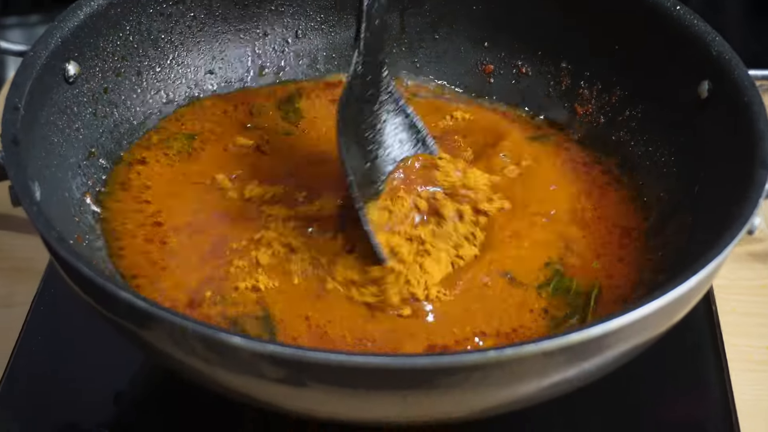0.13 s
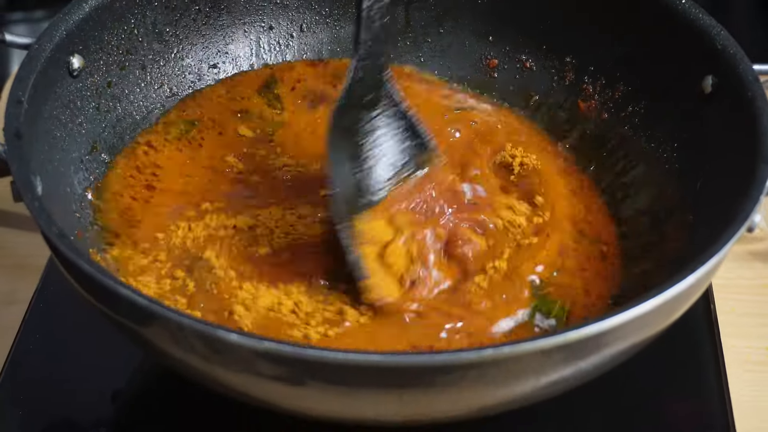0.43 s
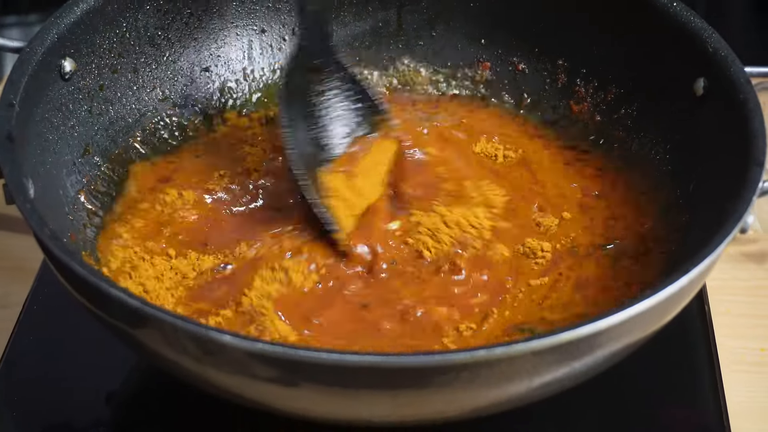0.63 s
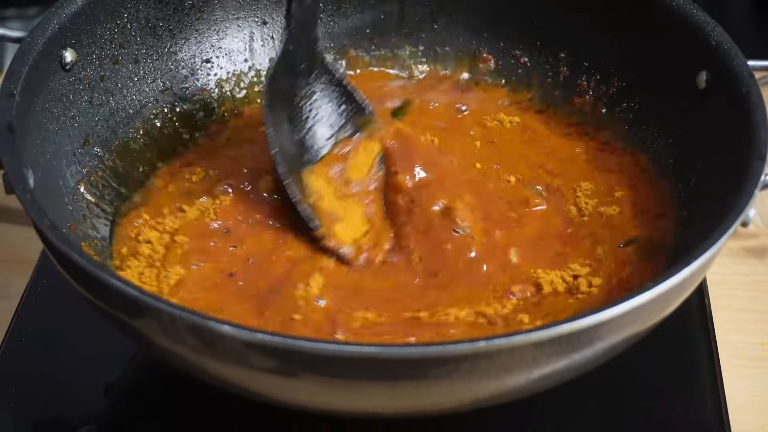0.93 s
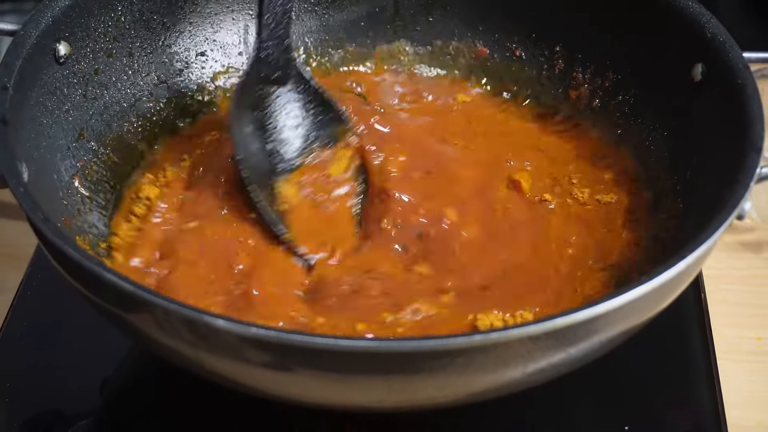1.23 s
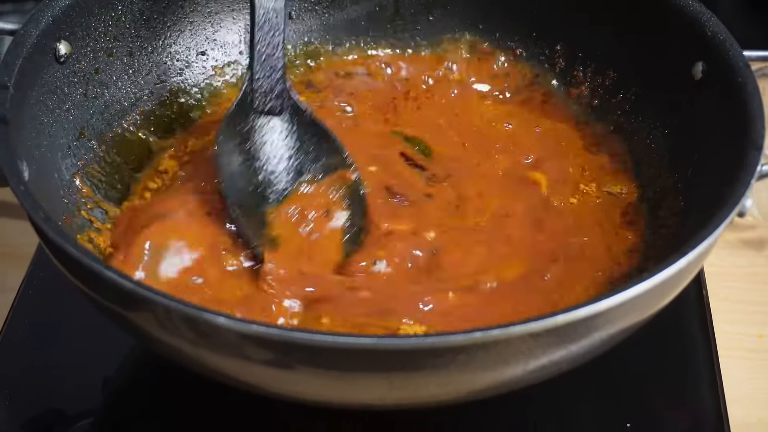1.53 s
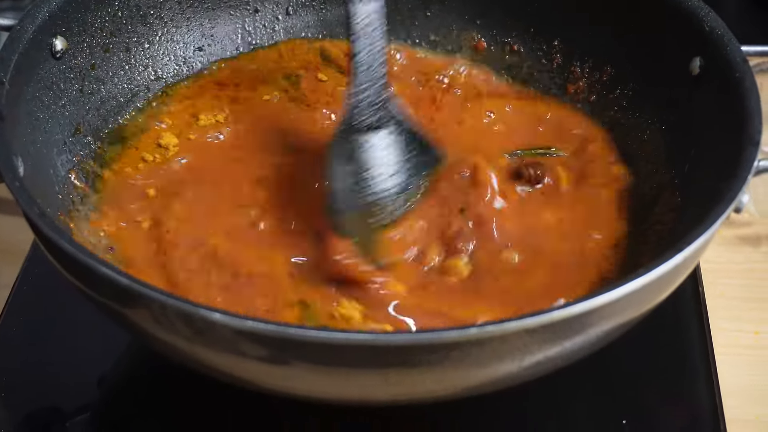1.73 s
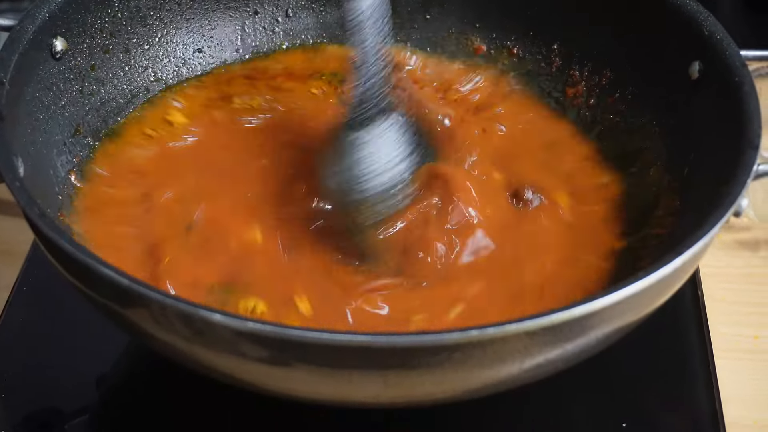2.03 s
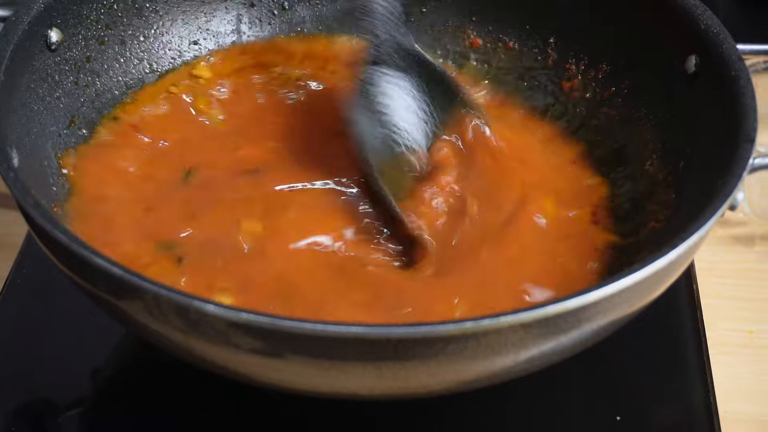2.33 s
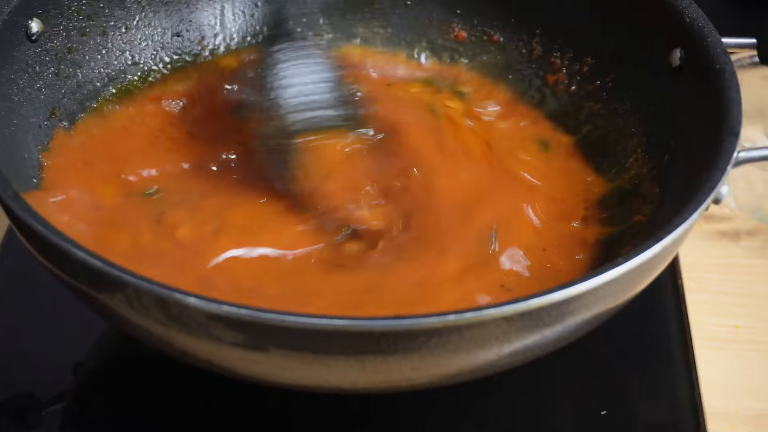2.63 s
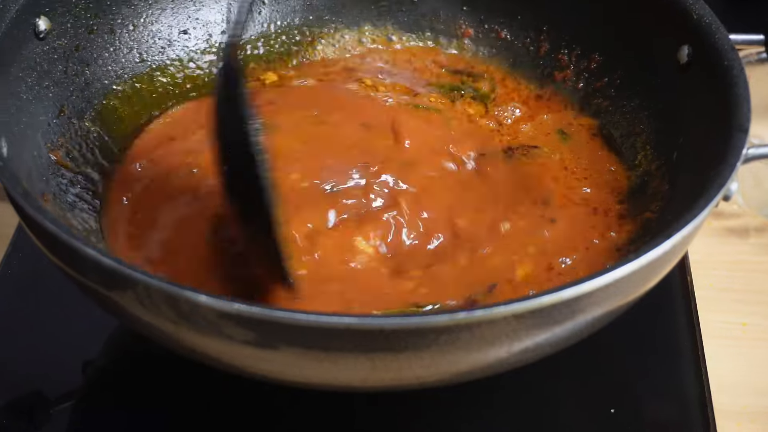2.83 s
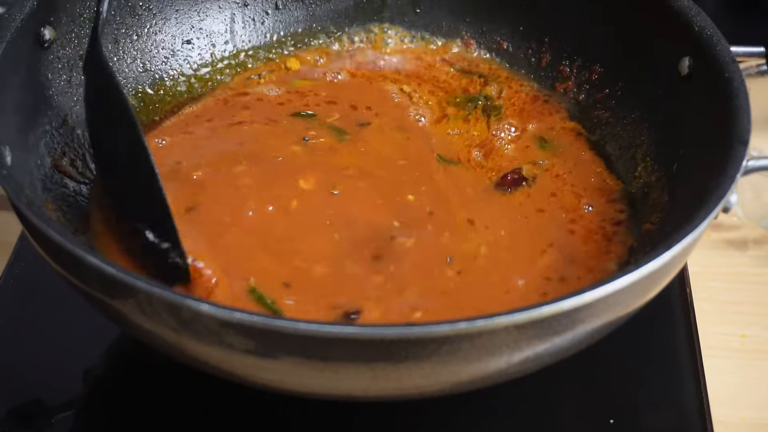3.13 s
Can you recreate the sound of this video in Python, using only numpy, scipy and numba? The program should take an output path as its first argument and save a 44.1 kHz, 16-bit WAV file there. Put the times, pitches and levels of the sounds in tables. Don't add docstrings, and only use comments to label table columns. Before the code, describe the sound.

A steady sputtering sizzle of boiling sauce starts slightly calmer, strengthens within a second and stays lively, with popping bubbles, crackling drops and stirring pulses. Close, dry kitchen pickup, a hood fan humming quietly below.

```python
import sys
import numpy as np
from scipy import signal
from scipy.fft import rfft, irfft
from scipy.io import wavfile
from scipy.ndimage import uniform_filter1d
from numba import njit

SR = 44100
rng = np.random.default_rng(int(sys.argv[2]) if len(sys.argv) > 2 else 0)


def voltage_ratio(decibels):
    exponent = np.asarray(decibels, float) / 20
    return 10 ** exponent


def digitize_waveform(pressure):
    field = np.atleast_2d(pressure).T
    bounded = np.clip(field, -1, 1)
    quanta = np.round(bounded * 32767).astype(np.int16)
    wavfile.write(sys.argv[1], SR, quanta)


N = 145530

# (time [s], half length [s], treble loss [dB])
WAVES = [(0.0, .03, 5), (.18, .055, 8), (.51, .055, 9), (.835, .03, 4), (1.15, .04, 8), (1.455, .045, 7),
         (1.59, .025, 2), (1.745, .045, 9), (2.075, .035, 6), (2.2, .025, 2), (2.37, .055, 7),
         (2.75, .04, 2), (3.065, .045, 7), (3.28, .04, 3)]
# (time [s], level [dB])
HEAT = [
    (0, 1.5),
    (.3, 3),
    (.7, 6),
    (1.5, 5),
    (2.3, 5),
    (2.55, 5.1),
    (3.0, 5.5),
    (3.3, 4),
]
# (frequency [Hz], level [dB per Hz])
SIZZLE_TONE = [(700, -24), (1300, -7), (1900, -4), (2800, -2), (5000, -1), (7000, -6.5), (11000, -9.5),
               (15700, -19.5)]
# (frequency [Hz], level [dB per Hz])
FAN_TONE = [(40, -26), (105, -32), (125, -5), (200, -2.5), (500, 6.5), (800, 4), (1300, -8.5), (2500, -9.5)]
# (pitch [Hz], width [Hz], level [dB])
FAN_HUMPS = [(86, 23, -88), (127, 6.7, -76), (180, 16, -71.5), (247, 42, -67), (402, 42, -79),
             (553.5, 23, -63.5), (1162, 190, -53)]
# (time [s], peak level [dB], pitch [Hz])
TICKS = [(0.0312, -21.5, 3500), (0.26, -20.0, 3200), (0.3245, -19.5, 3300), (0.3762, -19.0, 6100),
         (0.4003, -19.0, 4200), (0.6546, -18.0, 4300), (0.7022, -18.0, 1700), (0.7183, -16.5, 3900),
         (0.7457, -17.5, 2900), (0.7563, -17.0, 13000), (0.8037, -17.5, 3500), (0.8769, -17.0, 3500),
         (0.9818, -18.5, 4700), (0.9899, -17.5, 10800), (1.0288, -18.0, 6200), (1.0563, -15.5, 3200),
         (1.0691, -17.5, 4000), (1.0785, -17.0, 5300), (1.092, -17.5, 2800), (1.0981, -17.5, 4000),
         (1.1222, -17.5, 2500), (1.2969, -18.5, 6400), (1.3762, -14.0, 4800), (1.3852, -16.0, 3300),
         (1.4227, -19.0, 5900), (1.4698, -18.5, 3700), (1.5125, -17.0, 3900), (1.6176, -18.5, 5200),
         (1.6529, -17.0, 4700), (1.6672, -16.5, 5300), (1.691, -17.5, 3700), (1.7968, -18.0, 4000),
         (1.8141, -19.0, 13000), (1.8913, -18.5, 3300), (1.9007, -18.5, 3700), (1.9386, -17.5, 5200),
         (1.9539, -19.0, 4900), (1.9881, -17.5, 4700), (2.0135, -17.0, 4100), (2.0366, -18.0, 5900),
         (2.1165, -18.0, 2900), (2.2927, -15.0, 4300), (2.3788, -15.0, 4500), (2.4664, -17.0, 3300),
         (2.4729, -18.0, 2300), (2.4988, -17.5, 12300), (2.5888, -18.5, 3000), (2.6588, -15.0, 4500),
         (2.6882, -17.5, 1700), (2.7021, -17.0, 4200), (2.7307, -17.5, 5200), (2.741, -18.0, 2800),
         (2.8809, -19.0, 2100), (2.9031, -17.5, 3000), (2.9292, -19.0, 7500), (3.121, -17.5, 4100),
         (3.148, -18.5, 9900), (3.2046, -20.0, 2000), (3.2493, -20.0, 2800), (3.2631, -18.5, 2800)]
# (time [s], peak level [dB], pitch [Hz], length of ring [cycles])
SPITS = [(.0498, -21, 4200, 4), (.0655, -21, 2000, 5), (.0697, -19, 1800, 3), (.0922, -18, 2700, 5),
         (.1216, -13, 2600, 3), (.1597, -23, 2900, 12), (.2987, -20, 3650, 22), (.4199, -19, 4900, 16),
         (.7861, -13, 3100, 7), (.817, -14, 2900, 8), (.8592, -18, 2300, 6), (.8804, -17, 2600, 7),
         (.9138, -18, 2800, 18), (.9707, -14, 3600, 3), (1.2261, -17, 3150, 8), (1.4491, -19, 1700, 8),
         (1.506, -17, 4130, 8), (1.5419, -13, 2600, 5), (1.7545, -19, 2000, 10), (1.7645, -21, 2400, 6),
         (1.7814, -20, 6200, 5), (1.8467, -18, 2850, 14), (2.1365, -18, 4580, 14), (2.1665, -17, 4100, 14),
         (2.2119, -21, 1900, 18), (2.3371, -18, 1800, 9), (2.5621, -20, 2170, 30), (2.6359, -21, 2070, 8),
         (2.7117, -17, 2700, 10), (2.7916, -15, 3700, 6), (2.8442, -18, 2960, 4), (2.9917, -18, 2300, 4),
         (3.1732, -19, 2100, 7)]
# (time [s], peak level [dB])
SPLASHES = [
    (.787, -13),
    (2.168, -15),
    (2.794, -13),
    (3.1745, -13),
    (3.177, -15),
    (1.378, -15),
    (1.783, -16),
    (2.472, -16),
]
# (middle [s], half length [s], pitch [Hz], level [dB], pitch drift [share per half length])
SWARMS = [(0.201, 0.038, 2750, -43, .02), (0.419, 0.025, 4760, -38, .02), (.54, .05, 1900, -37.5, 0.057),
          (.6, .04, 3140, -39.5, .04), (0.774, 0.028, 5040, -37.5, 0.013), (.788, 0.019, 3030, -38, .01),
          (.85, 0.052, 2300, -40.5, .03), (0.907, .035, 2760, -39, .05), (1.081, 0.048, 5000, -37, .02),
          (1.094, .03, 2930, -38, .01), (1.183, .04, 2110, -39, .05), (1.384, 0.042, 4770, -37, .02),
          (1.477, .04, 1830, -40.5, 0.025), (1.53, .025, 2820, -39, .01), (1.676, 0.035, 4940, -35, .01),
          (1.752, 0.021, 2700, -37, .01), (1.833, 0.022, 2780, -40, 0.023),
          (2.003, 0.057, 4970, -36.5, 0.019), (2.08, .02, 1800, -39, .01), (2.104, 0.042, 2760, -40, .01),
          (2.229, .008, 1110, -38, .05), (2.301, .027, 4900, -39, .01), (2.393, 0.052, 1750, -39.5, 0.0036),
          (2.339, .012, 1870, -37, .01), (2.728, 0.052, 1790, -38.5, .02), (2.731, .06, 2820, -40.5, .01),
          (3.03, 0.036, 1750, -36.5, -.05), (3.059, .05, 2400, -42, -.03), (3.089, 0.031, 1900, -42, .02)]
# (frequency [Hz], side minus mid [dB])
WIDTH = [(110, -29), (300, -15), (750, -16.5), (1200, -25), (2400, -22), (5100, -22), (6000, -7.5),
         (7500, -3), (15000, -2)]

SIZZLE_DB, SIZZLE_PER_S, SIZZLE_CYCLES = -33.5, 22000, 6.5
COVER_HZ = 6260
RIM_HZ, RIM_WIDTH_HZ, RIM_DB = 12730, 1480, 8.5
BURST_SCATTER_DB, EVEN_HZ = 3.3, 11000
RAREST_SHARE = .004
FAN_DB = -51
BLIP_PER_S, BLIP_CYCLES, BLIP_DB = 280, 32.4, -37
CRACKLE_PER_S, CRACKLE_CYCLES, CRACKLE_DB = 220, 2.5, -31
TICK_CYCLES, TICK_TRIM_DB, TICK_EDGE_DB = 5, 1.5, -5
SPRAY_DROPS, SPRAY_S, SPRAY_DB, SPRAY_CYCLES = 9, .0022, -7.5, 6
CRACK_CYCLES, SPIT_CRACK_DB, SPIT_THUD_DB, SPIT_TRIM_DB = 2.5, -2, -24, 2
SWARM_PER_S, SWARM_SPREAD, SWARM_CYCLES, SWARM_SCATTER_DB = 320, .065, 14.0, 3.3
RIGHT_LEAN = 0.26
PAN_T60_S, PAN_WET_DB = .02, -17
TOP_HZ, BURST_LOW_HZ = 15950, 850


def level(x, db):
    return x * voltage_ratio(db) / np.sqrt(np.mean(x[0] ** 2))


def read(table, hz):
    points = np.array(table)
    return np.interp(np.log(np.maximum(hz, 1)), np.log(points[:, 0]), points[:, 1])


def heat_at(t):
    return np.interp(t, *np.array(HEAT).T)


def walk(rate):
    k = int(SR / rate)
    steps = np.repeat(rng.standard_normal(N // k + 1), k)
    return 4.2 * uniform_filter1d(uniform_filter1d(steps, k), k)[:N]


@njit
def ring(out, start, hz, cycles, size, side, glide, rise, sr):
    for e in range(len(start)):
        w = 2 * np.pi * hz[e] / sr
        n = int(cycles[e] * sr / hz[e]) + 2
        z = size[e] + 0j
        turn = np.exp(1j * w - 5.5 / n)
        bend = np.exp(1j * w * glide / n)
        closed, q = 1., np.exp(-1 / (rise * n))
        for i in range(max(start[e], 0), min(start[e] + n, out.shape[1])):
            closed *= q
            out[0, i] += (1 - closed) * z.imag
            out[1, i] += (1 - closed) * (z * side[e]).imag
            z *= turn
            turn *= bend
    return out


def bubbles(t, hz, cycles, db, glide, rise):
    hz = np.clip(hz, 100, .4 * SR)
    side = np.exp(2j * np.pi * rng.random(len(t))) - RIGHT_LEAN
    start = (t * SR).astype(np.int64)
    return ring(np.zeros((2, N)), start, hz, cycles + 0 * t, voltage_ratio(db), side,
                glide, max(rise, .001), float(SR))


def sizzle():
    u = rng.random((int(SIZZLE_PER_S * N / SR), 4)).T
    t = u[0] * N / SR
    hz = 700 * (16000 / 700) ** u[1]
    cover = sum(loss * np.exp(-((t - mid) / half) ** 2) for mid, half, loss in WAVES)
    cover = cover / (1 + (COVER_HZ / hz) ** 4)
    heat = heat_at(t) + 0.37 * walk(30.07)[(u[0] * N).astype(int)]
    rim = 20 * np.log10(1 + voltage_ratio(RIM_DB) / (1 + ((hz - RIM_HZ) / RIM_WIDTH_HZ) ** 2))
    tone = read(SIZZLE_TONE, hz) + 20 * np.log10(hz)
    scatter = BURST_SCATTER_DB / (1 + .5 * (hz / EVEN_HZ) ** 2)
    db = tone + rim + heat - cover - scatter * np.log(u[2] + RAREST_SHARE)
    return level(bubbles(t, hz, SIZZLE_CYCLES * (.5 + u[3]), db, 0.28, 0.092), SIZZLE_DB)


def fan():
    f = np.arange(N // 2 + 1) * SR / N
    noise = rfft(rng.standard_normal((2, N)))
    out = level(irfft(noise * voltage_ratio(read(FAN_TONE, f)) / (1 + (f / 3000) ** 4), N), FAN_DB)
    for hz, width, db in FAN_HUMPS:
        hump = noise * 1j / (1 + (2 * (f - hz) / width) ** 2)
        out = out + level(irfft(hump, N), db)
    return out


def blips():
    u = rng.random((int(BLIP_PER_S * N / SR), 4)).T
    t = u[0] * N / SR
    db = BLIP_DB - 3.3 * np.log(u[2] + 10 * RAREST_SHARE) + heat_at(t)
    return bubbles(t, 1500 * 4.76 ** u[1], BLIP_CYCLES * (.5 + u[3]), db, 0.24, 0.13)


def crackle():
    u = rng.random((int(CRACKLE_PER_S * N / SR), 4)).T
    t, hz = u[0] * N / SR, 2100 * 2.5 ** u[1]
    db = CRACKLE_DB - 3 * np.log(u[2] + 20 * RAREST_SHARE) + heat_at(t)
    body = bubbles(t, hz, CRACKLE_CYCLES * (1 + u[3]), db, .05, .02)
    return body + bubbles(t, 2.6 * hz, CRACKLE_CYCLES, db - 3, 0., .01)


def ticks():
    t, db, hz = np.array(TICKS, float).T
    db = db + TICK_TRIM_DB
    body = bubbles(t, hz, TICK_CYCLES, db, .05, .04)
    return body + bubbles(t, np.minimum(2.2 * hz, RIM_HZ), CRACK_CYCLES, db + TICK_EDGE_DB, 0., .01)


def spray():
    t, db = np.array([row[:2] for row in TICKS + SPITS + SPLASHES], float).T[:, :, None]
    u = rng.random((len(t), SPRAY_DROPS, 3))
    late = -SPRAY_S * np.log(1 - .95 * u[..., 0])
    hz = 1400 * 6 ** ((np.arange(SPRAY_DROPS) + u[..., 1]) / SPRAY_DROPS)
    size = db + SPRAY_DB + 5 * np.log10(hz / 4000) - 6 * u[..., 2]
    return bubbles((t + late).ravel(), hz.ravel(), SPRAY_CYCLES, size.ravel(), .1, .03)


def spits():
    t, db, hz, cycles = np.array(SPITS, float).T
    t, db = t + .0008, db + SPIT_TRIM_DB
    blunt = 20 * np.log10(4 / cycles)
    body = bubbles(t, hz, cycles, db, .08, .03)
    crack = bubbles(t, 2.3 * hz, CRACK_CYCLES, db + SPIT_CRACK_DB + blunt / 2, 0., .01)
    thud = bubbles(t, .55 * hz, CRACK_CYCLES, db + SPIT_THUD_DB + blunt, 0., .03)
    return body + crack + thud


def swarms():
    out = 0
    for middle, half, hz, db, drift in SWARMS:
        u, g = rng.random((150, 3)).T, rng.standard_normal(150)
        place = (np.arange(len(g)) + u[2]) / (SWARM_PER_S * half) - 1.3
        fade = -7 * place ** 2 - 99 * (place > 1.3)
        scatter = -SWARM_SCATTER_DB * np.log(u[0] + 10 * RAREST_SHARE)
        size = fade + scatter + db + 10 * np.log10(hz / 2000) + 10.5
        pitch = hz * np.exp(SWARM_SPREAD * g + drift * np.clip(place, -2, 2))
        out = out + bubbles(middle + half * place, pitch, SWARM_CYCLES * (.5 + u[1]), size, 0.11, 0.066)
    return out


def pan(food):
    t = np.arange(int(.08 * SR)) / SR
    tail = rng.standard_normal(len(t)) * np.exp(-np.log(1000) * t / PAN_T60_S) * (t > .0008)
    tail = tail[None] / np.sqrt(np.sum(tail ** 2))
    return food + voltage_ratio(PAN_WET_DB) * signal.fftconvolve(food, tail, axes=1)[:, :N]


def scene():
    food = sizzle() + swarms() + spits() + blips() + crackle() + ticks() + spray()
    food = signal.sosfilt(signal.butter(4, BURST_LOW_HZ, "high", fs=SR, output="sos"), food)
    mid, side = pan(food) + fan()
    f = np.arange(N // 2 + 1) * SR / N
    side = irfft(rfft(side) * voltage_ratio(read(WIDTH, f)), N)
    return np.array([mid + side, mid - side])


def band_limit(x):
    return signal.sosfilt(signal.butter(12, 17030, fs=SR, output="sos"), x)


def record(dry):
    mix = signal.sosfilt(signal.butter(2, 60, "high", fs=SR, output="sos"), dry)
    mix = signal.sosfilt(signal.ellip(10, .3, 70, TOP_HZ, fs=SR, output="sos"), mix)
    return band_limit(mix)


dry = scene()
out = record(dry)
digitize_waveform(out)
```